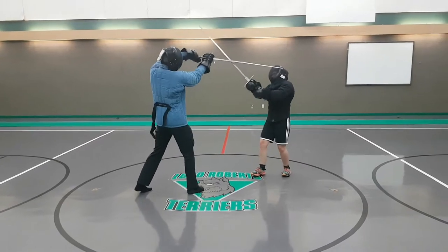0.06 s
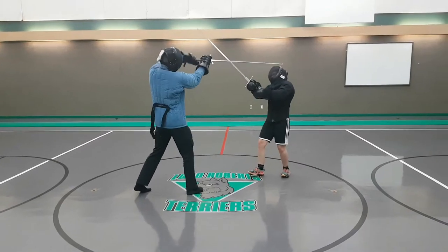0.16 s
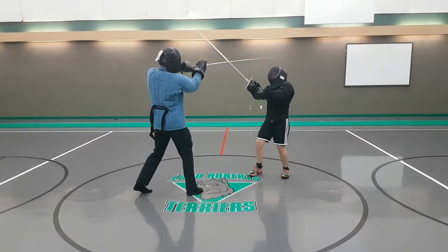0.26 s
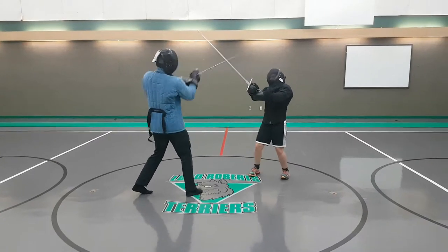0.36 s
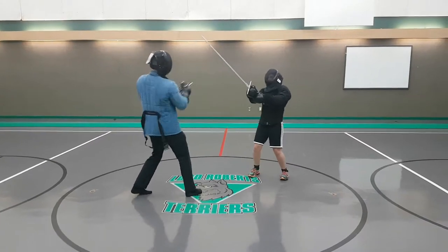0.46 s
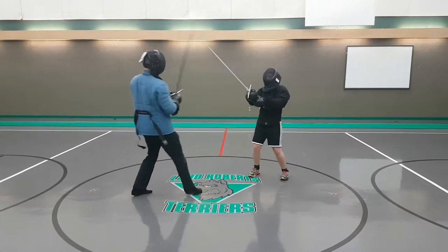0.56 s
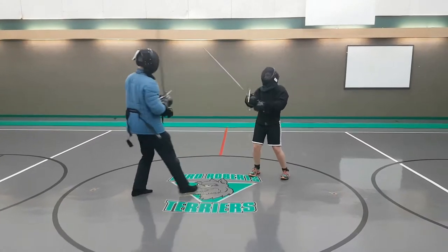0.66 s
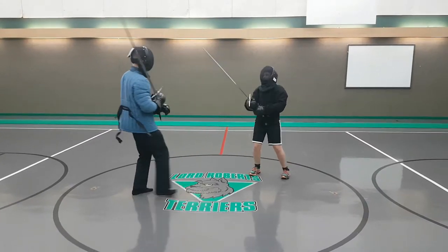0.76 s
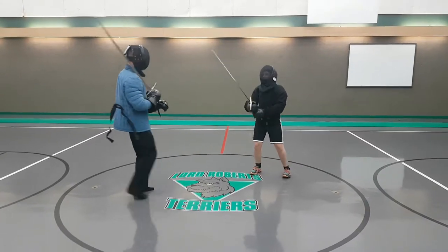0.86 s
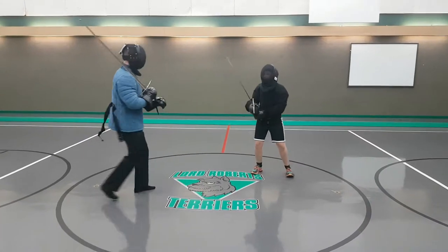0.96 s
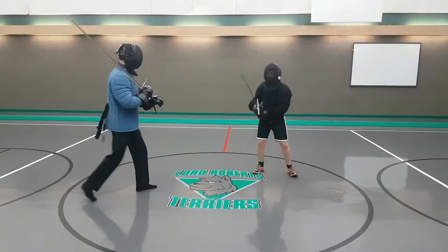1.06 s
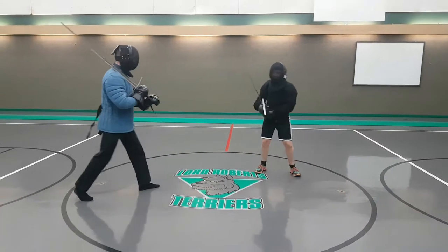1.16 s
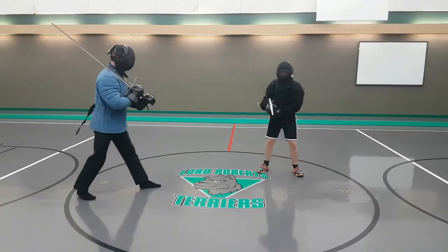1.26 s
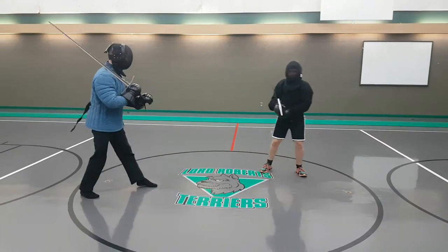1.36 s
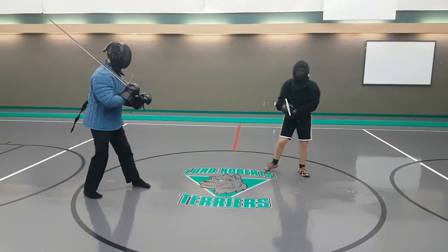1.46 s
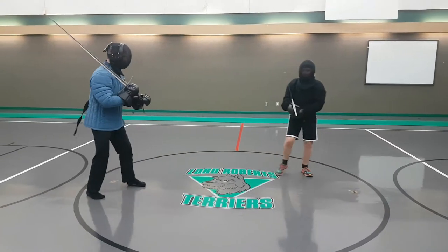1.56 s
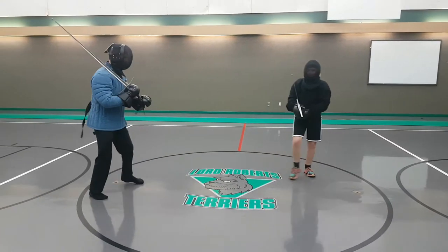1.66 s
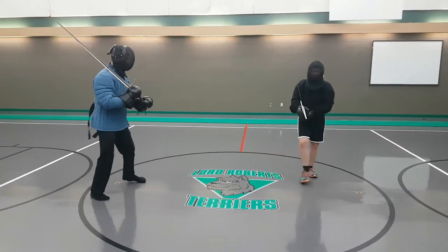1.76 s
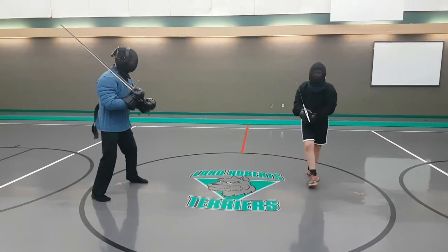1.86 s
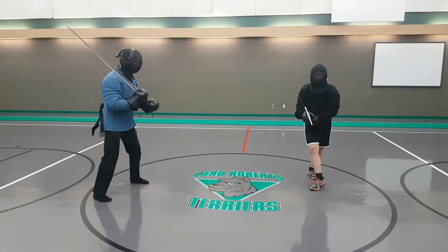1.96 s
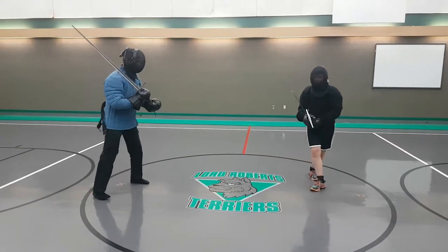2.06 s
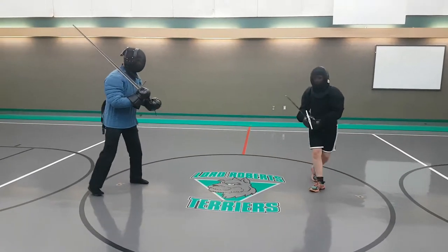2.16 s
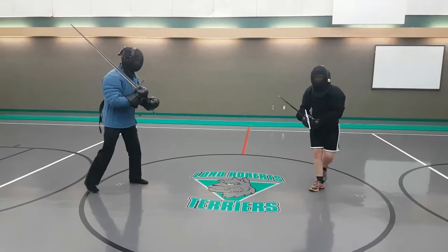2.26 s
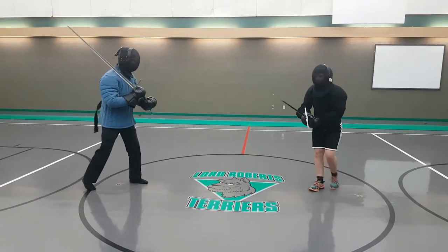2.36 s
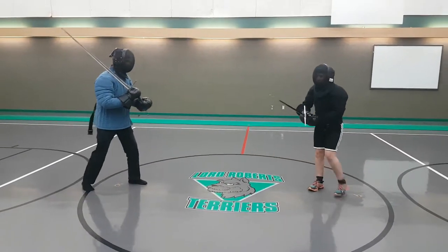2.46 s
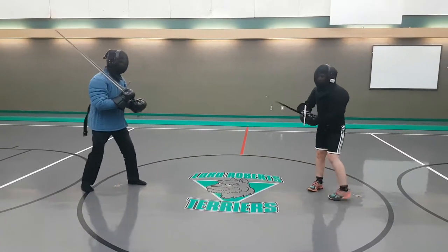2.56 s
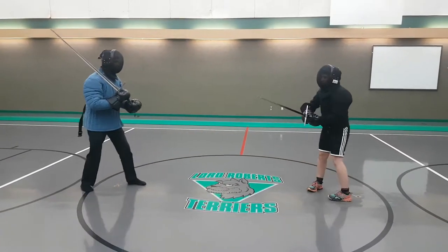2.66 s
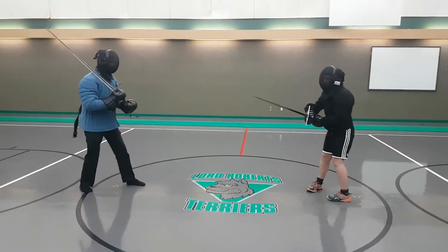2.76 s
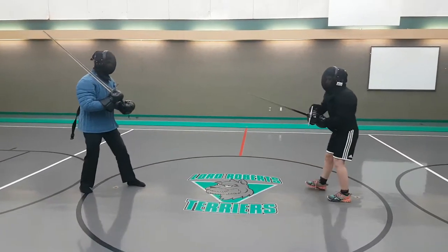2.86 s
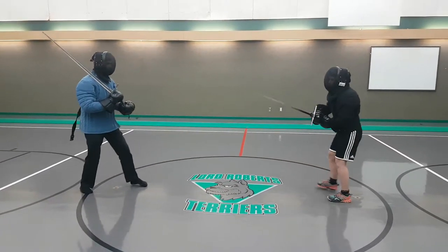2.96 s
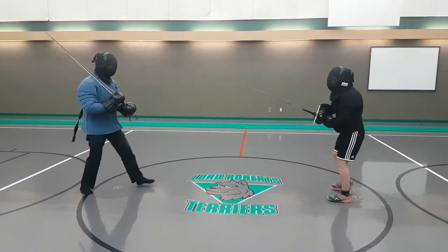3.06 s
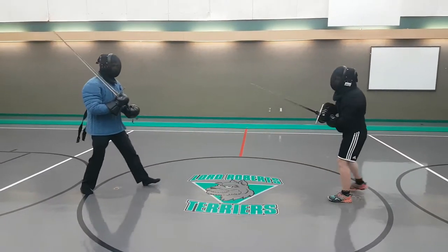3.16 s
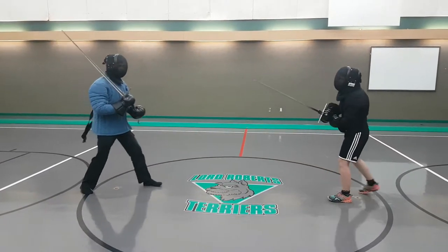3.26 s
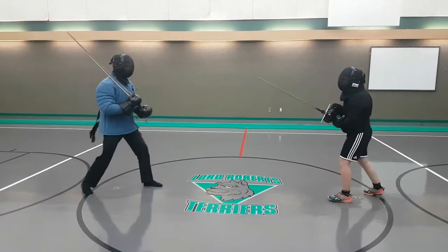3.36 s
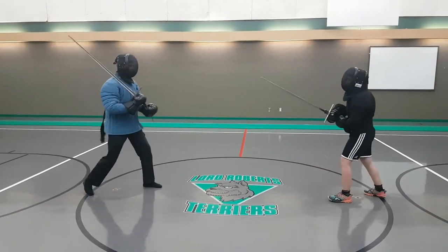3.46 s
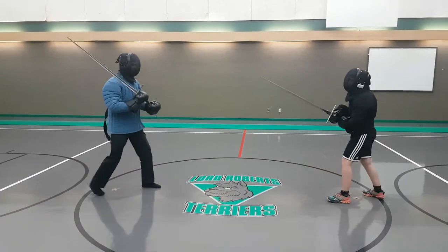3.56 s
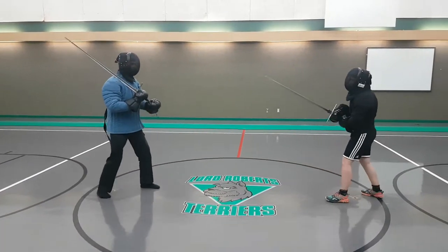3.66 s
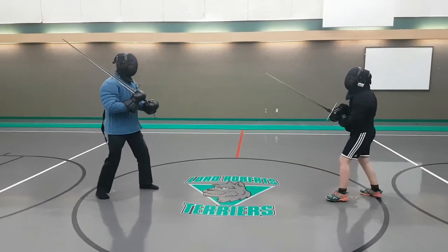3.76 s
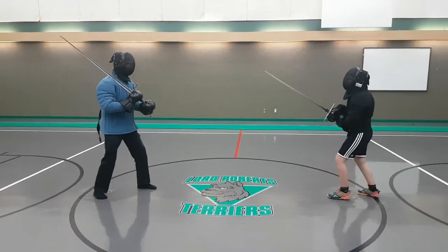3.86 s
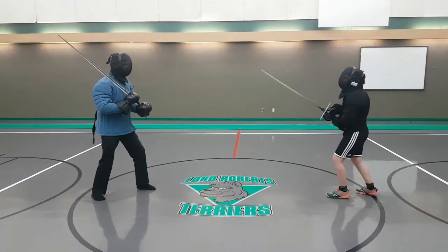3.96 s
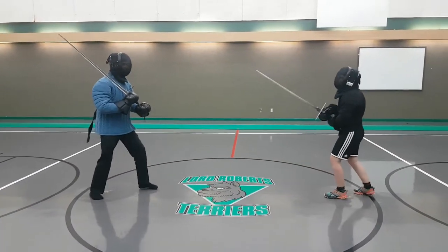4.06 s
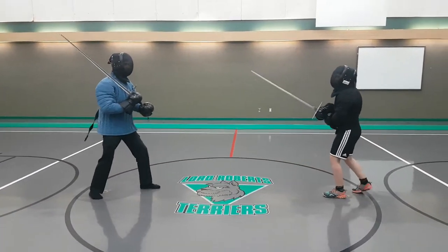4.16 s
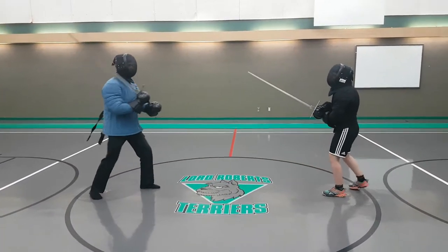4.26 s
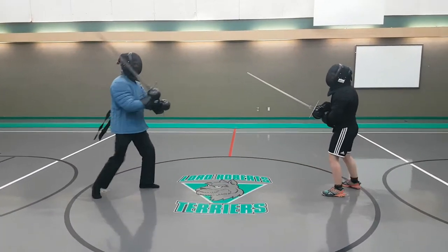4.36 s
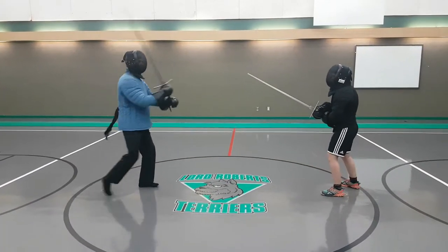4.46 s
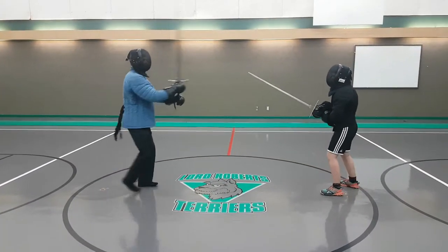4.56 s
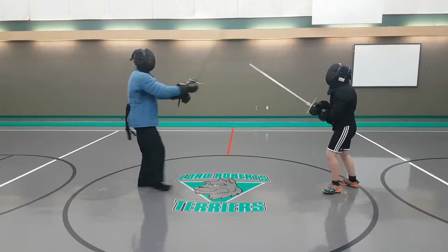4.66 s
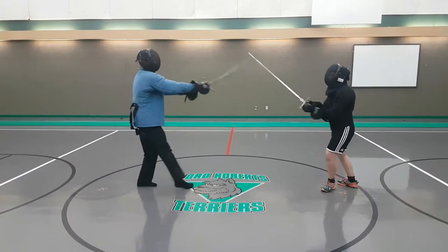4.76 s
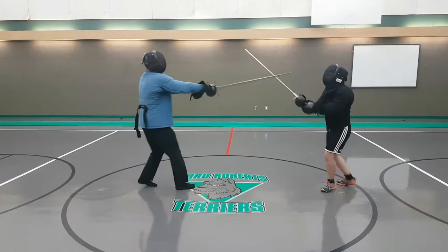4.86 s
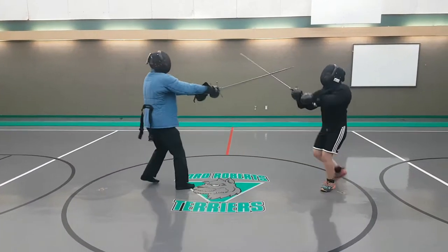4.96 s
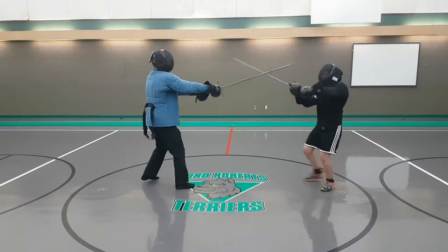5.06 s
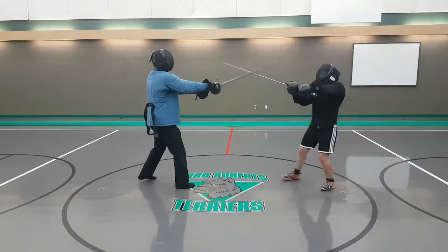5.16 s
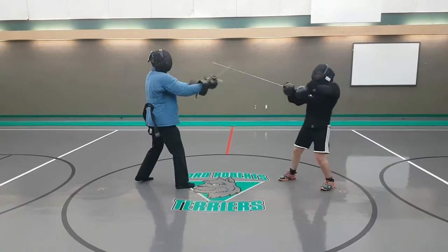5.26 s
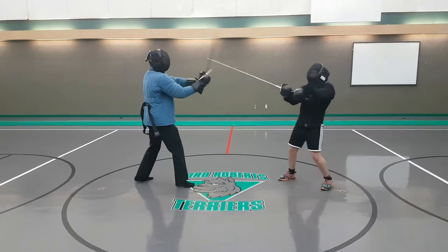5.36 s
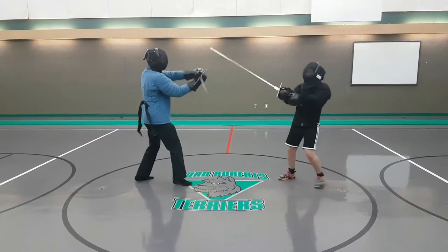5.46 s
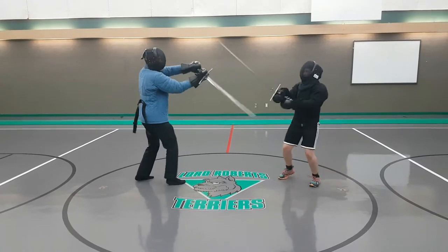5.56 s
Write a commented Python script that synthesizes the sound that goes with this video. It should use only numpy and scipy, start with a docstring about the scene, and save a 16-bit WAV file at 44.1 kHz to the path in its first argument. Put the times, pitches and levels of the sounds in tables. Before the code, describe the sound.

A steel clash fades in an echoing gym, shoes tap and faintly squeak, then one hard blade strike rings out and sings.

```python
"""Practice swords in a gymnasium

Two fencers spar with steel blades: a clash dies away at the start, shoes tap and squeak, then the blades
meet hard and keep singing. Impacts are noise bursts and decaying sinusoidal modes; squeaks are jittered
glides. A hall response of decaying noise adds a long tail with a late swell from the far walls.
The sprung floor booms in filtered noise, and steady noise forms the ventilation rumble and rush.
"""
import sys
import numpy as np
from scipy import signal
from scipy.fft import rfft, irfft, next_fast_len
from scipy.io import wavfile

SR = 44100
rng = np.random.default_rng(int(sys.argv[2]) if len(sys.argv) > 2 else 0)


def pcm_store(signal):
    """Save signal as 16-bit PCM."""
    levels = np.round(np.clip(np.atleast_2d(signal), -1, 1) * 32767)
    wavfile.write(sys.argv[1], SR, levels.astype(np.int16).T)


N = 246959

# Blade clashes: (time [s], crack level [dB], clang level [dB], ring level [dB], crack treble [dB])
CLASHES = [(-.2, -3.5, -9, -11.5, -3), (4.9044, -.3, 1.5, 0, 0)]
# Strongly struck blade modes that the contact damps at once: (frequency [Hz], level [dB], T60 [s])
CLANG_MODES = [(850, -23, .08), (1960, -20, .07), (2930, -19, .08), (3600, -16, .08), (4450, -19, .06),
               (5095, .5, .05), (5190, -4, .06), (5490, -5, .055), (5820, -13, .07), (6170, -10, .08),
               (8980, -24, .06), (10690, -19, .07), (11400, -24, .07), (12300, -20, .07), (12980, -23, .07),
               (13800, -22, .07), (14600, -20, .07), (15520, -18, .07)]
# Free bending modes of the two blades: (frequency [Hz], level [dB], T60 [s])
BENDING_MODES = [(900, -10, .9), (953, -11, .8), (1071, -17, 1.6), (1523, -1, .9), (1942, -7, .9),
                 (2120, -6, .8), (2417, -11, .8), (2622, -8, 1), (3602, -5, 1.2), (4183, -9, .9),
                 (4450, -8, 1.1), (4662, -7, .8), (5097, 1, .7), (5269, -1, .9), (5500, -2, .6),
                 (5539, -4, .9), (5827, -3, .85), (5986, -3, .85), (6179, 0, .8), (6417, -11, .9),
                 (6572, -12, .8), (6821, -14, 1.6), (9060, -22, .7), (10687, -18, .7), (11100, -22, .65),
                 (11690, -20, .6), (12298, -18, .6), (13800, -21, .65), (14500, -16, .55), (15543, -19, .7)]
# Modes that sing as the blades slide free:
# (time [s], frequency [Hz], level [dB], T60 [s], relative level with the blade edge-on [dB])
SINGING_MODES = [(.27, 6120, -54, 1.5, -4), (5.135, 4856, -40, .8, -8), (5.235, 5410, -36, 12, -18),
                 (5.28, 6115, -49, 12, -12), (5.31, 4425, -42, .45, -18)]
# Shoes meeting the floor: (time [s], slap level [dB], knock level [dB])
STEPS = [(.33, -21, -16), (3.449, -29, -31), (3.564, -20.5, -11), (3.849, -22, -33), (4.73, -26, -28),
         (4.811, -28, -23)]
# Rubber soles squeaking:
# (time [s], length [s], start pitch [Hz], middle pitch [Hz], end pitch [Hz], level [dB])
SQUEAKS = [(2.303, 0.053, 3990, 3510, 3780, -61.5), (2.366, 0.026, 2910, 2720, 2700, -57.5),
           (2.394, 0.027, 2500, 2330, 2140, -57), (2.43, 0.02, 7100, 6500, 5400, -69)]
# Modes of the floor boards under a shoe: (frequency [Hz], level [dB], T60 [s])
KNOCK_MODES = [(206, 5.5, 0.037), (475, 2.5, 0.033), (817, -10, 0.044), (2140, -14.5, 0.047),
               (3300, -25.5, .025)]
# Shifts of weight that make the sprung floor boom: (time [s], level [dB])
BOOMS = [(.33, -51), (.62, -54), (4.82, -45), (4.93, -49), (5.42, -51)]

# Spectrum of the blade contact: (frequency [Hz], density [dB per Hz])
CRACK_SPECTRUM = [(60, -23), (200, -9.5), (400, -1), (900, -3.5), (1200, -5), (1900, 4.5), (3300, 1.5),
                  (4400, 1), (5600, 5), (6500, -3), (7600, -11.5), (9600, -15.5), (11500, -10.5),
                  (15500, -18)]
# Spectrum of a sole slapping the floor: (frequency [Hz], density [dB per Hz])
SLAP_SPECTRUM = [(100, -24), (450, -1), (900, 4), (1400, -5), (2200, -4), (3300, -7.5), (5000, -29),
                 (8000, -36), (15000, -55)]
# Spectrum of the floor boom: (frequency [Hz], density [dB per Hz])
BOOM_SPECTRUM = [(20, -12), (42, -1), (52, -7), (80, -31), (200, -58)]
# Spectrum of the duct rumble: (frequency [Hz], density [dB per Hz])
RUMBLE_SPECTRUM = [(12, -59), (20, -29), (38, -20), (59, -13), (72, -32), (81, -2.5), (118, 1), (173, -1.5),
                   (232, -10), (258, -12), (308, -14.5), (334, -19.5), (367, -11.5), (398, -19.5),
                   (500, -24.5), (650, -59), (1100, -120)]
# Spectrum of the rush of the vents: (frequency [Hz], density [dB per Hz])
RUSH_SPECTRUM = [(290, -36), (500, -6), (553, -7.5), (594, -0.5), (658, -5), (828, -7.5), (1260, -11),
                 (2110, -15.5), (2510, -19), (3310, -22), (4110, -27), (8090, -43.5), (15000, -35.5),
                 (15700, -32.5)]
# Radiation of the narrow blades, best for high modes: (frequency [Hz], gain [dB])
BLADE_RADIATION = [(1500, -1), (4400, 1), (5200, 4), (6200, 6), (7000, 2), (15000, 2)]

# Left minus right for the blades: (frequency [Hz], level difference [dB])
BLADE_BALANCE = [(700, 1), (1300, -1), (2400, -5.5), (4400, -6), (5500, -18), (6800, -12.5), (9000, -12),
                 (14000, -4.5)]
# Left minus right for the ventilation: (frequency [Hz], level difference [dB])
VENT_BALANCE = [(110, -1.5), (500, 0), (1300, -2), (2400, -4.5), (4400, -4), (8000, -2), (15000, 2)]
# Likeness of diffuse sound in the two channels: (frequency [Hz], correlation [-])
CORRELATION = [(130, 0.99), (300, 0.94), (640, 0.75), (1400, 0.06), (3000, 0.017)]
# Reverberation time of the hall: (frequency [Hz], T60 [s])
HALL_T60 = [(200, 1.07), (1000, 1.56), (2500, 1.24), (5000, 1.17), (8000, 0.83), (14000, 0.57)]
# Distinct reflections from the floor and the near and far walls: (delay [s], level [dB])
ECHOES = [(.0075, -25), (.044, -5.5), (.049, -5.5), (.068, -8), (.172, -12), (.215, -13.5), (.25, -21)]
# Absorption of an echo by the air: (frequency [Hz], gain per second of travel [dB/s])
AIR_ABSORPTION = [(5500, 0), (14000, -55)]

TURN_S, BEND = .19, .0008  # time between views of a turning blade's flat; peak share of pitch bend
BOOM_RISE_S, BOOM_T60_S = .074, .87
RUMBLE_DB, RUSH_DB = -38, -53.5
BUILD_S, FAR_WALL_S, FAR_SPREAD_S = .0069, .23, .043  # near-wall build-up; time and width of the far swell
FAR_SWELL_DB, LATE_DB = 3.5, 5.5
TOP_HZ = 15750  # upper band edge
LEAD = SR // 2  # samples kept ahead of time zero, for sounds that begin earlier
AGE = np.arange(3 * SR // 2) / SR  # time since the onset of one event [s]


def swords(hall):
    """Impact excitation: each clash is a shimmering crack, a damped clang and the free ring of both blades."""
    crack, clang, ring = np.zeros((3, LEAD + N))
    for s, crack_db, clang_db, ring_db, treble_db in CLASHES:
        contact = unit(burst(t60=.05)) + .55 * unit(shimmer(spacing_hz=110, t60=.2))
        contact = unit(colour(contact, CRACK_SPECTRUM))
        hardness = [(1000, 0), (9000, treble_db)]  # a glancing blow is duller
        add(crack, s, undb(crack_db) * colour(contact, hardness))

        blow = undb(clang_db) * modes(CLANG_MODES, rise_s=.0062)
        add(clang, s, blow)
        for delay, db in ECHOES:
            echo = colour(blow, AIR_ABSORPTION, share=delay)
            add(clang, s + delay, undb(db) * echo)

        free_ring = modes(BENDING_MODES, rise_s=.005, beat=.7, spin_hz=6)
        add(ring, s, undb(ring_db) * free_ring)

    sound = in_hall(crack, hall, direct_db=4, hall_db=13.5)
    sound += in_hall(clang, hall, direct_db=-7.5, hall_db=-21)
    sound += in_hall(colour(ring, BLADE_RADIATION), hall, direct_db=-32.5, hall_db=-40)
    sound += in_hall(singing(), hall, direct_db=-2, hall_db=-20)
    return np.array([colour(sound[0], BLADE_BALANCE), sound[1]])


def burst(t60):
    """Broadband excitation: a rattle of tiny contacts, whitened and confined to t60 in turn."""
    x = rng.standard_normal(len(AGE)) * fade(t60) * np.minimum(AGE / .0013, 1)
    window = np.clip(2 - 2 * AGE / t60, 0, 1)
    for _ in range(6):
        white = irfft(np.exp(1j * np.angle(rfft(x))))  # equal energy at all frequencies
        x = white * window
    return x


def shimmer(spacing_hz, t60):
    """High modal density: many faint, unevenly spaced twisting modes of the blades and guards."""
    hz = np.arange(spacing_hz * 8, TOP_HZ, spacing_hz)
    shift, size, phase = rng.random((len(hz), 3)).T
    lines = np.zeros(len(AGE) // 2 + 1, complex)
    places = ((hz + spacing_hz * shift) * len(AGE) / SR).astype(int)
    lines[places] = (.5 + size) * np.exp(2j * np.pi * phase)
    return irfft(lines, len(AGE)) * fade(t60) * np.minimum(AGE / .0017, 1)


def modes(table, rise_s, beat=0, spin_hz=6):
    """Modal superposition: decaying partials build up in contact; on a turning blade each beats at its own rate."""
    ring = 0
    for (hz, db, t60), (phase, turn, pace) in zip(table, rng.random((len(table), 3))):
        turn_hz = spin_hz * (.5 + pace)
        facing = 1 + beat * np.sin(2 * np.pi * (turn_hz * AGE + turn))
        partial = np.sin(2 * np.pi * (hz * AGE + phase))
        ring = ring + undb(db) * fade(t60) * facing * partial
    return ring * np.minimum(AGE / rise_s, 1)


def singing():
    """Directional radiation: tones swell and dip as the blade turns, and the swing bends their pitch."""
    track = np.zeros(LEAD + N)
    flat = np.sin(np.pi * AGE / TURN_S) ** 2  # 1 with the flat towards the listener, 0 edge-on
    for s, hz, db, t60, edge_db in SINGING_MODES:
        facing = flat + undb(edge_db) * (1 - flat)
        onset = np.minimum(2 * AGE / TURN_S, 1)
        bend = 1 + BEND * np.sin(2 * np.pi * (AGE / TURN_S / 2 + rng.random()))
        tone = np.sqrt(2) * np.sin(2 * np.pi * np.cumsum(hz * bend) / SR)
        add(track, s, undb(db) * fade(t60) * facing * onset * tone)
    return track


def shoes(hall, left_db=-2.5):
    """Impact and stick-slip friction: soles slap and knock on the sprung floor, and squeak as they twist."""
    steps, squeaks = np.zeros((2, LEAD + N))
    for s, slap_db, knock_db in STEPS:
        slap = unit(colour(burst(t60=.021), SLAP_SPECTRUM))
        knock = unit(modes(KNOCK_MODES, rise_s=.0036))
        add(steps, s, undb(slap_db) * slap + undb(knock_db) * knock)

    for s, length, *pitches, db in SQUEAKS:
        u = np.linspace(0, 1, int(length * SR))
        hz = np.polyval(np.polyfit([0, .5, 1], pitches, 2), u)  # smooth glide through three pitches
        jitter = 1 + .1 * rng.standard_normal(len(u))
        phase = 2 * np.pi * np.cumsum(hz * jitter) / SR
        swell = np.sqrt(np.sin(np.pi * u).clip(0))
        add(squeaks, s, undb(db) * swell * (np.sin(phase) + .13 * np.sin(2 * phase)))

    sound = in_hall(steps, hall, direct_db=-1, hall_db=-1.5)
    sound += in_hall(squeaks, hall, direct_db=-.5, hall_db=-4)
    return sound * undb([[left_db], [0]])


def floor_boom():
    """Low resonance: low-passed noise swells and decays as the floor heaves under each shift of weight."""
    load = np.zeros(LEAD + N)
    rise = np.minimum(AGE / BOOM_RISE_S, 1)
    decay = np.minimum(undb(-60 * (AGE - BOOM_RISE_S) / BOOM_T60_S), 1)
    for s, db in BOOMS:
        add(load, s, undb(db) * rise * decay)
    heave = unit(colour(rng.standard_normal(N), BOOM_SPECTRUM)) * np.sqrt(N)  # unit RMS
    return heave * load[LEAD:]


def ventilation(spectrum, db):
    """Flow noise: air in the ducts fills the hall with steady, diffuse, spectrally shaped noise."""
    left, right = (colour(x, spectrum) for x in diffuse(N))
    air = np.array([colour(left, VENT_BALANCE, .5), colour(right, VENT_BALANCE, -.5)])
    return unit(air) * np.sqrt(N) * undb(db)


def hall_response():
    """Frequency-dependent reverberation: half-octave bands of diffuse noise decay, highest treble fastest."""
    noise = diffuse(len(AGE))
    spectrum = rfft(noise)
    octave = np.log2(np.clip(bins(noise), 125, 16000))
    tail = 0
    for centre in np.arange(np.log2(125), 14, .5):
        band = np.maximum(1 - 2 * abs(octave - centre), 0)  # overlapping triangles
        tail = tail + irfft(spectrum * band) * fade(at(HALL_T60, 2 ** centre))
    return unit(tail * reflection_density())


def reflection_density():
    """Reflection build-up: gain rises quickly, swells from the far walls, then holds a fuller late field."""
    far = np.exp(-.5 * ((AGE - FAR_WALL_S) / FAR_SPREAD_S) ** 2)
    late = 1 - np.exp(-(AGE / FAR_WALL_S / 2) ** 2)
    build_up = 1 - np.exp(-AGE / BUILD_S)
    return build_up * undb(FAR_SWELL_DB * far + LATE_DB * late)


def in_hall(track, hall, direct_db, hall_db):
    """Linear superposition: direct sound, one sample later on the left, plus convolution with the hall."""
    index = np.arange(len(track))
    direct = np.array([np.interp(index - 1, index, track), track])
    wet = signal.fftconvolve(track[None], hall, axes=1)[:, :len(track)]
    return (undb(direct_db) * direct + undb(hall_db) * wet)[:, LEAD:LEAD + N]


def diffuse(size):
    """Diffuse-field coherence: stereo noise alike in the bass and unrelated in the treble."""
    noise = rng.standard_normal((2, next_fast_len(size)))
    c = np.clip(at(CORRELATION, bins(noise)), 0, 1)
    mid, side = rfft(noise) * np.sqrt([(1 + c) / 2, (1 - c) / 2])
    return irfft(np.array([mid + side, mid - side]), noise.shape[1])[:, :size]


def fade(t60):
    """Exponential decay: the amplitude falls by 60 dB in t60 seconds."""
    return np.exp(-np.log(1000) * AGE / t60)


def colour(x, points, share=1):
    """Linear filtering: multiply the spectrum by a share of a dB curve, leaving phase alone."""
    size = next_fast_len(len(x) + SR // 10)
    padded = np.concatenate([x, np.zeros(size - len(x))])
    gain = undb(share * at(points, bins(padded)))
    return irfft(rfft(padded) * gain, size)[:len(x)]


def at(points, hz):
    """Logarithmic frequency scale: interpolate a table linearly in log frequency."""
    f, value = np.transpose(points)
    return np.interp(np.log(np.maximum(hz, 1)), np.log(f), value)


def bins(x):
    """Discrete spectrum: frequencies [Hz] of the transform of x."""
    return np.fft.rfftfreq(x.shape[-1], 1 / SR)


def undb(db):
    """Level definition: decibels to amplitude gain."""
    return 10 ** (np.asarray(db) / 20)


def unit(x):
    """Energy normalization: scale to unit mean energy per channel."""
    return x / np.sqrt(np.mean(np.sum(x ** 2, axis=-1)))


def add(track, s, sound):
    """Superposition in time: mix a sound in at s seconds, with time zero LEAD samples into the track."""
    start = max(LEAD + int(s * SR), 0)
    part = sound[:len(track) - start]
    track[start:start + len(part)] += part


def scene():
    """Superposition of sources: blades and shoes share the hall, over floor boom, duct rumble and vent rush."""
    hall = hall_response()
    action = swords(hall) + shoes(hall) + floor_boom()
    return action + ventilation(RUMBLE_SPECTRUM, RUMBLE_DB) + ventilation(RUSH_SPECTRUM, RUSH_DB)


def record(dry):
    """Band limitation: a steep elliptic low-pass cuts the top of the treble."""
    low_pass = signal.ellip(10, .2, 70, TOP_HZ, fs=SR, output="sos")  # order, ripple [dB], stopband [dB]
    return signal.sosfilt(low_pass, dry)


dry = scene()
out = record(dry)
pcm_store(out)
```